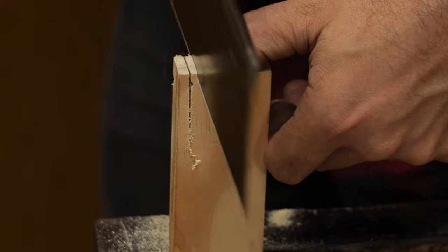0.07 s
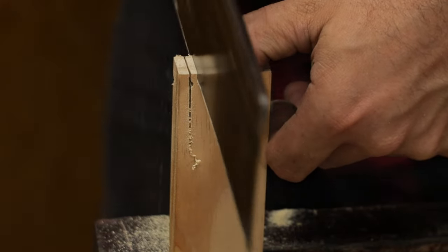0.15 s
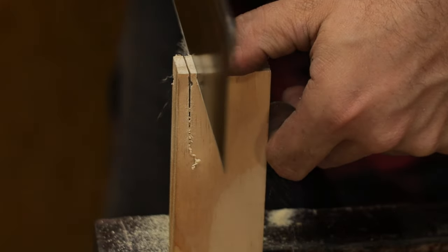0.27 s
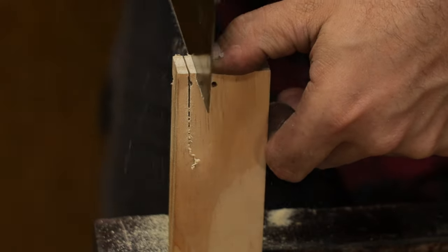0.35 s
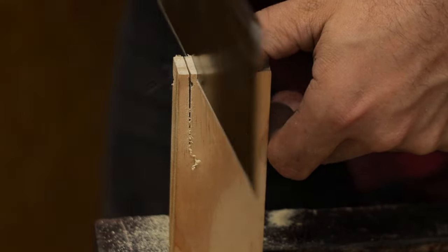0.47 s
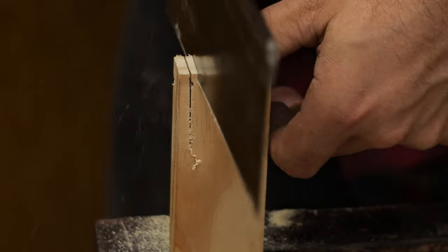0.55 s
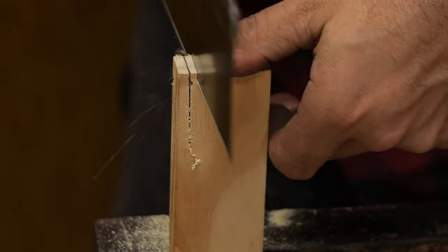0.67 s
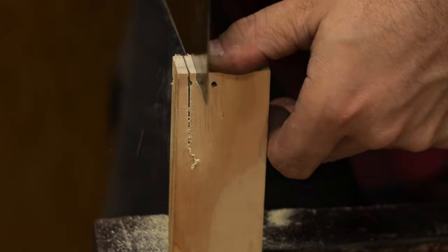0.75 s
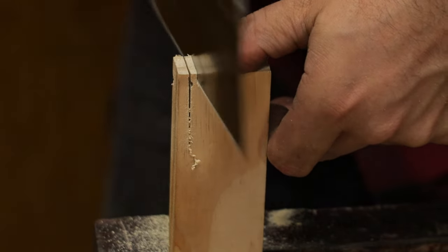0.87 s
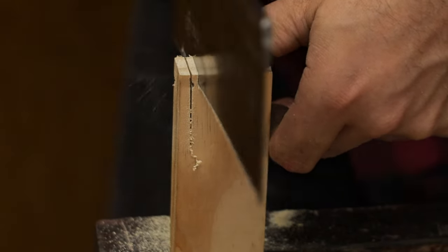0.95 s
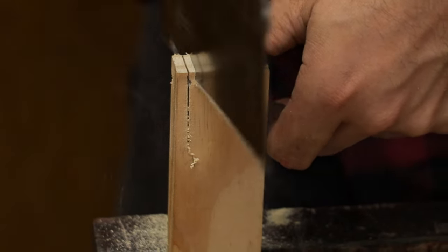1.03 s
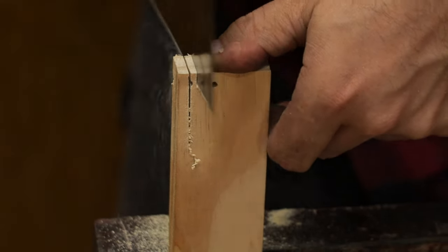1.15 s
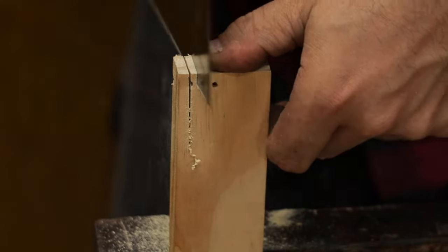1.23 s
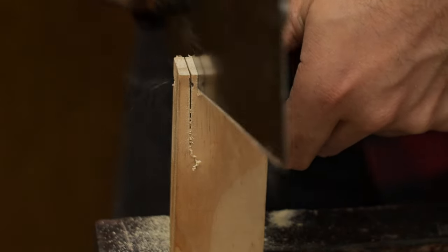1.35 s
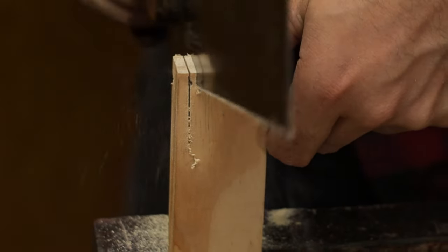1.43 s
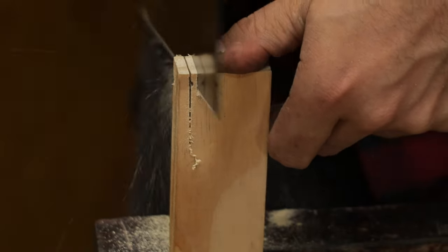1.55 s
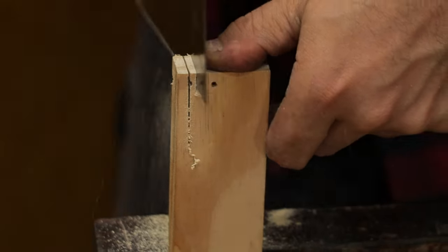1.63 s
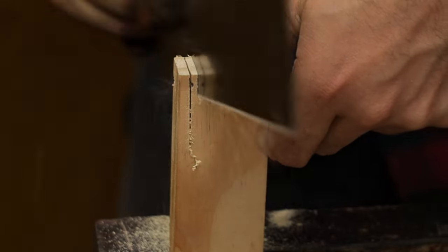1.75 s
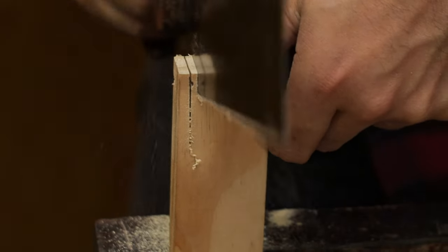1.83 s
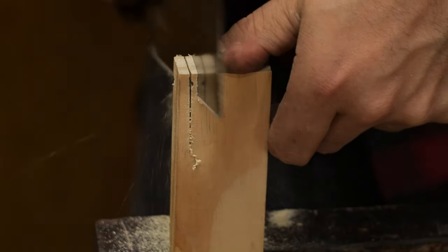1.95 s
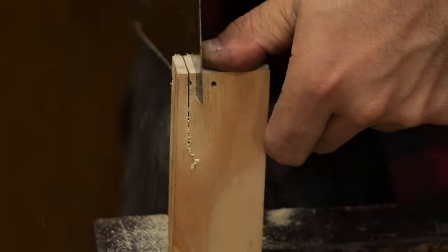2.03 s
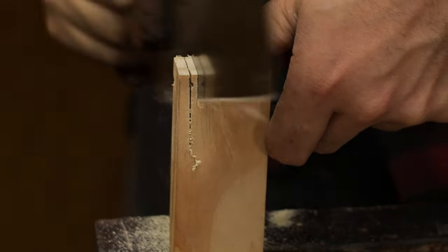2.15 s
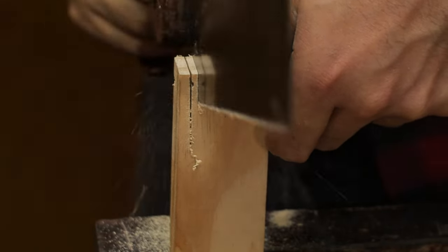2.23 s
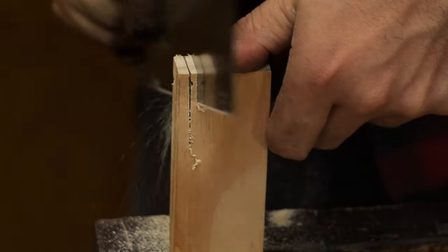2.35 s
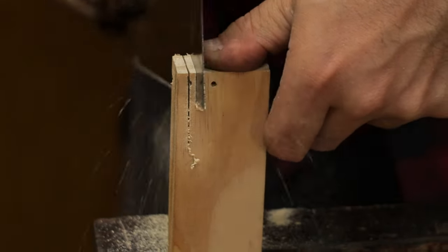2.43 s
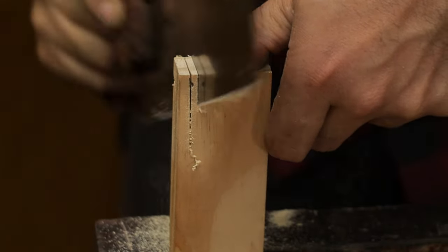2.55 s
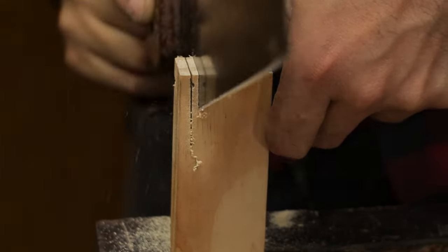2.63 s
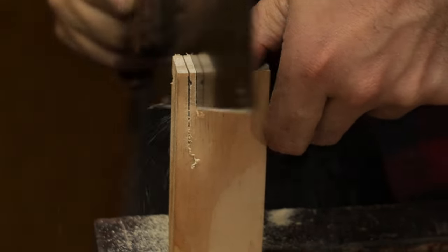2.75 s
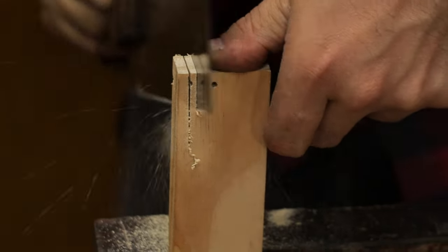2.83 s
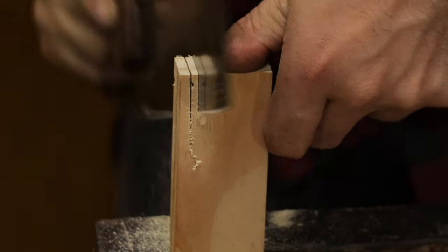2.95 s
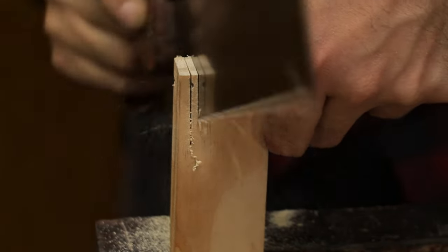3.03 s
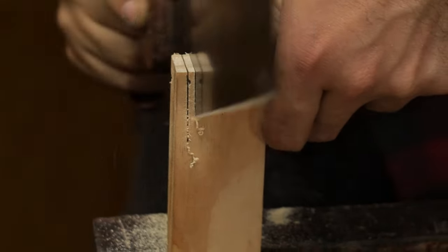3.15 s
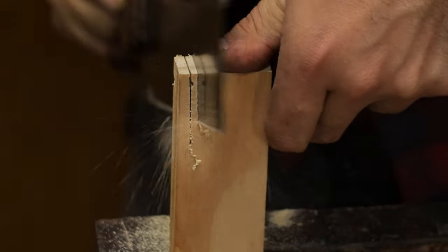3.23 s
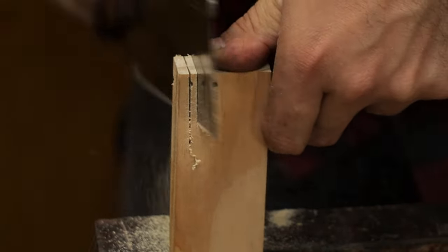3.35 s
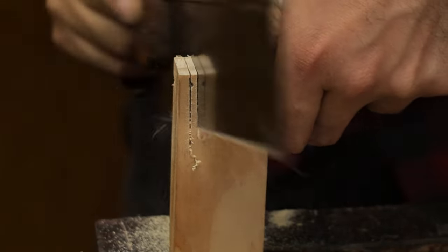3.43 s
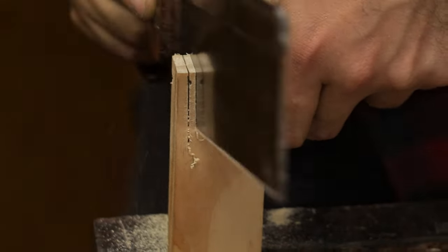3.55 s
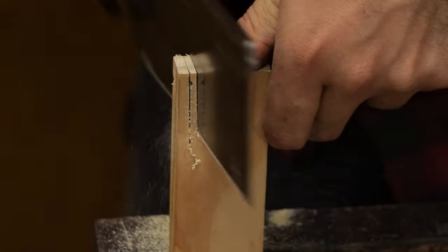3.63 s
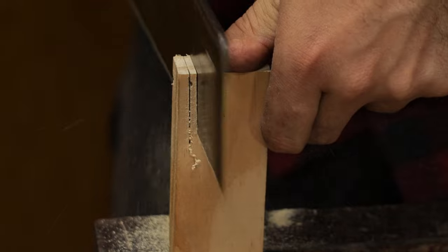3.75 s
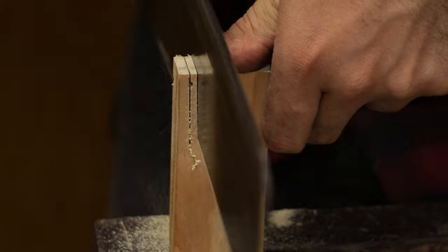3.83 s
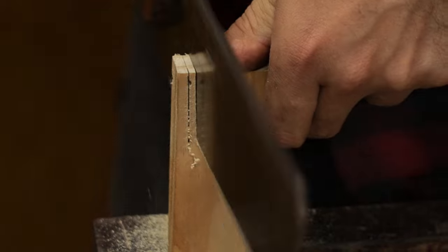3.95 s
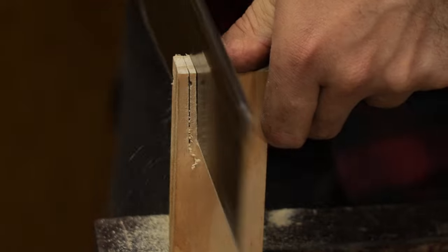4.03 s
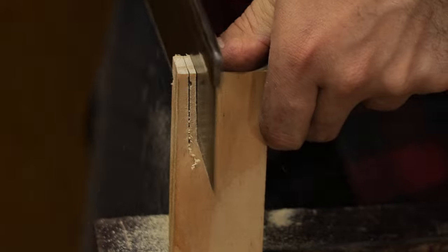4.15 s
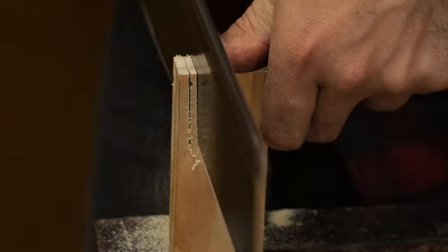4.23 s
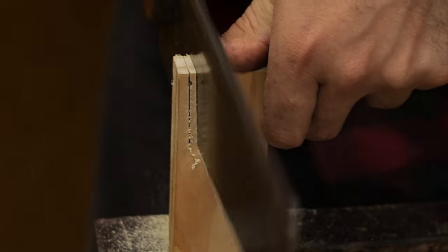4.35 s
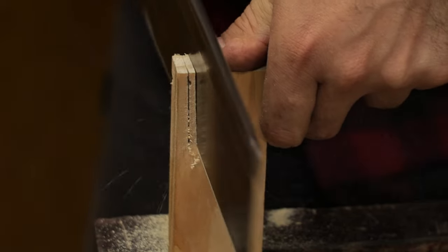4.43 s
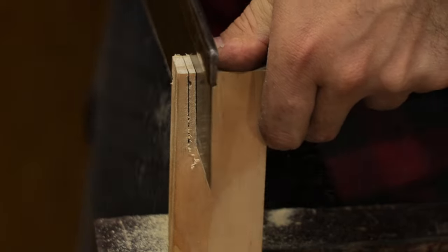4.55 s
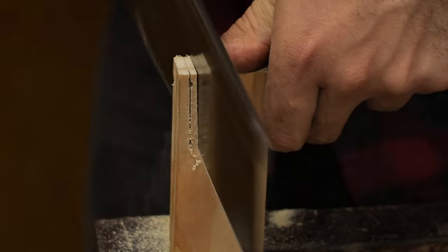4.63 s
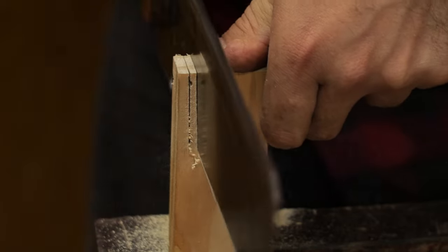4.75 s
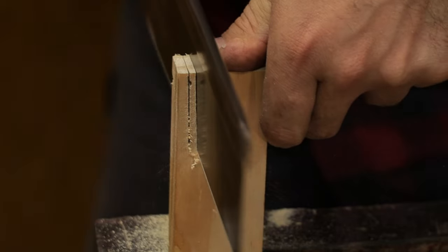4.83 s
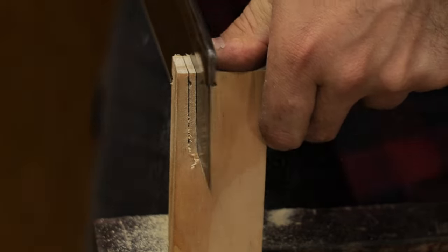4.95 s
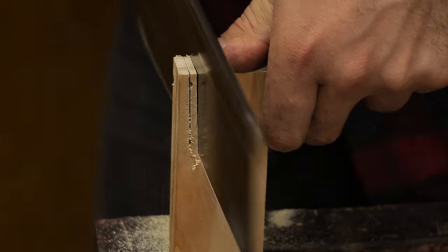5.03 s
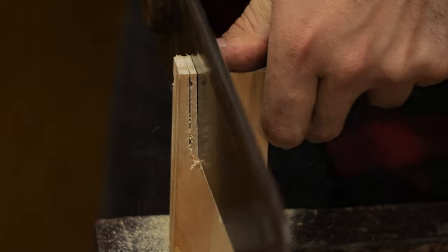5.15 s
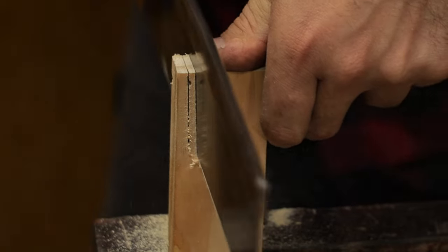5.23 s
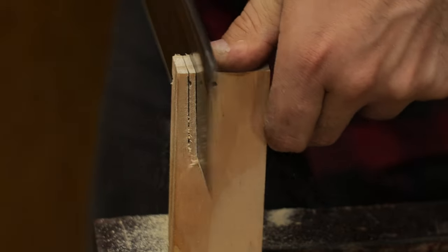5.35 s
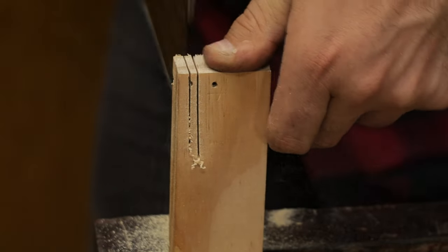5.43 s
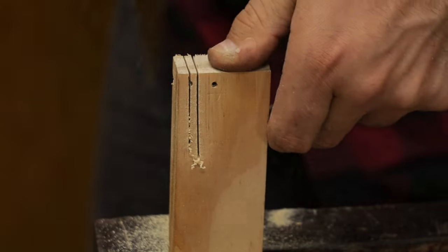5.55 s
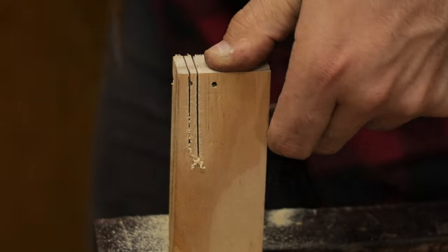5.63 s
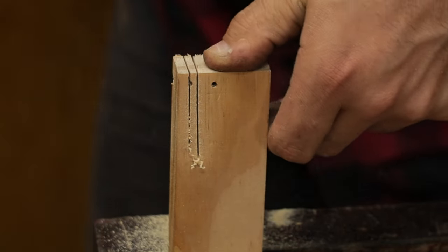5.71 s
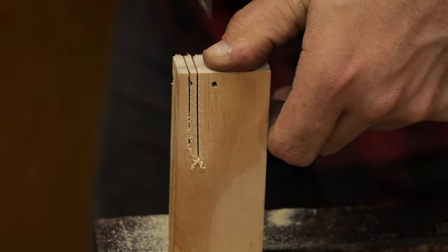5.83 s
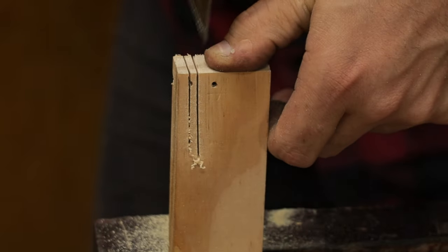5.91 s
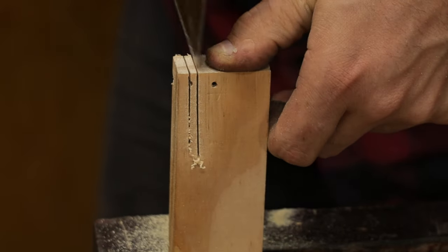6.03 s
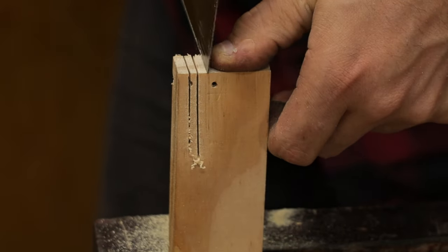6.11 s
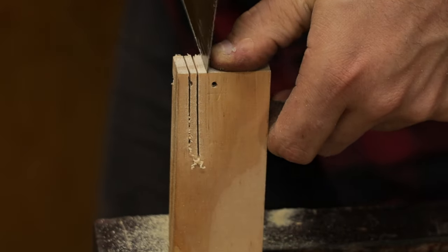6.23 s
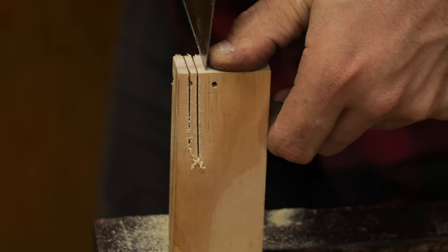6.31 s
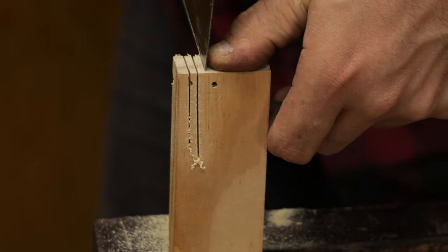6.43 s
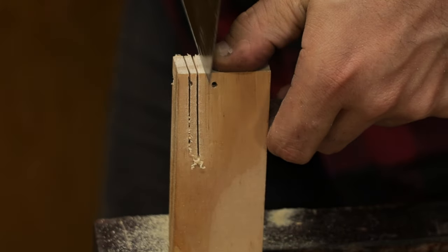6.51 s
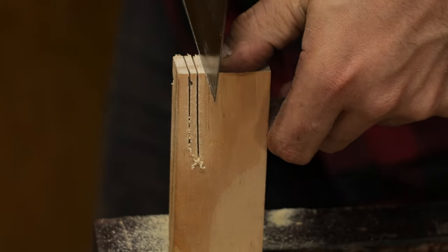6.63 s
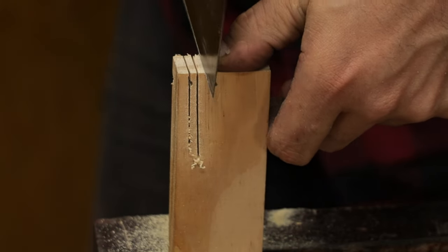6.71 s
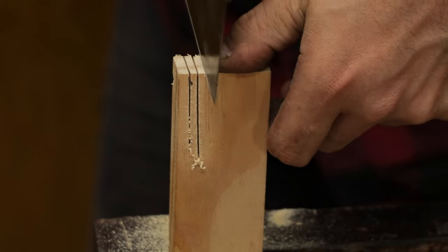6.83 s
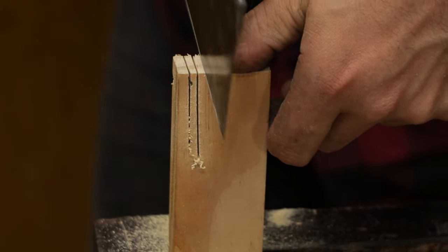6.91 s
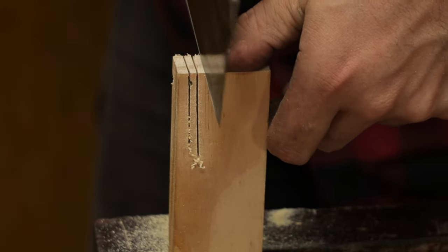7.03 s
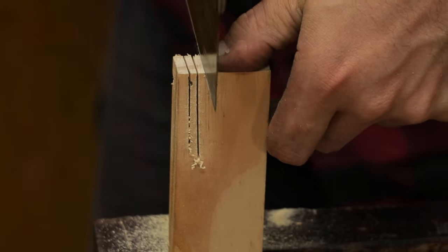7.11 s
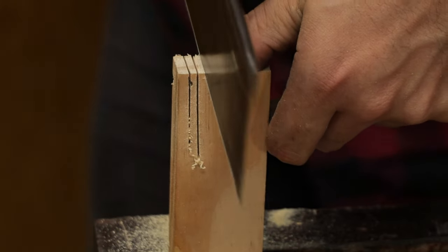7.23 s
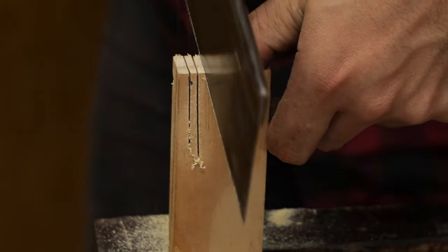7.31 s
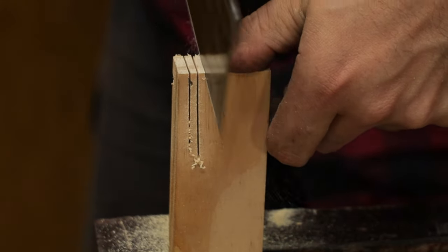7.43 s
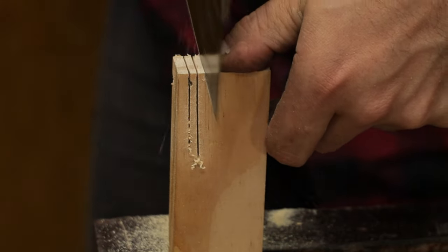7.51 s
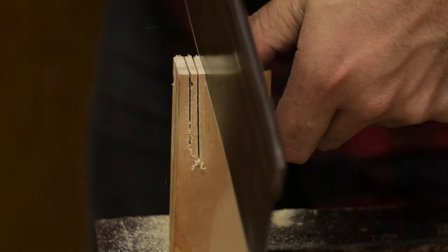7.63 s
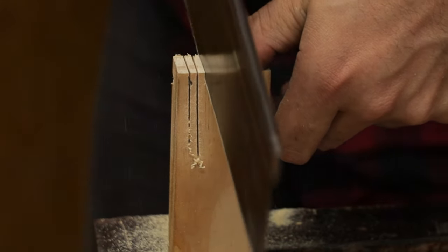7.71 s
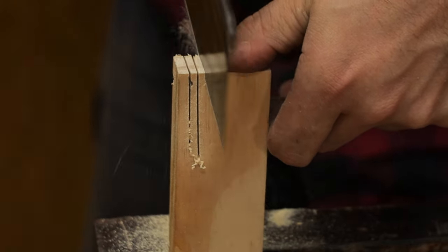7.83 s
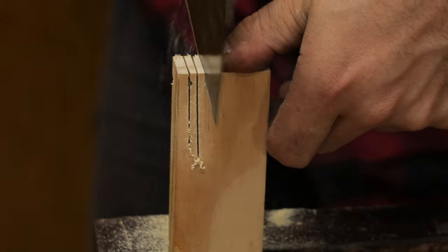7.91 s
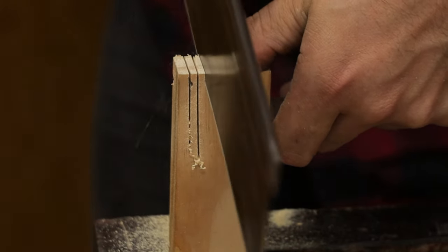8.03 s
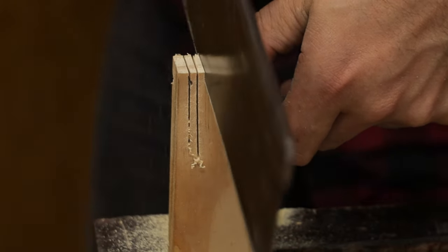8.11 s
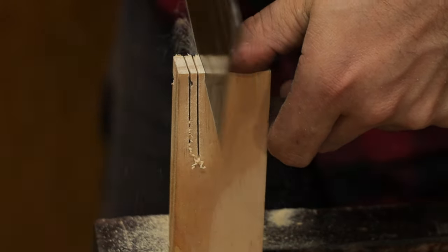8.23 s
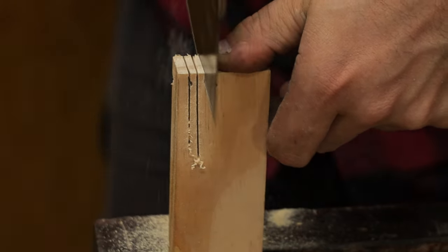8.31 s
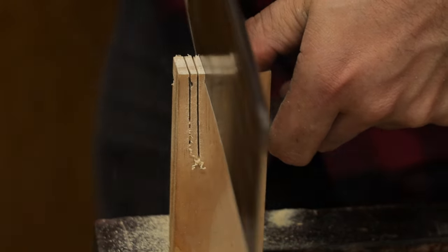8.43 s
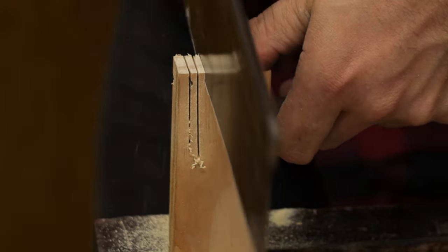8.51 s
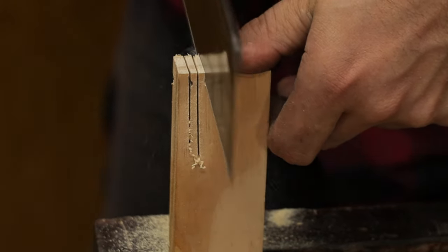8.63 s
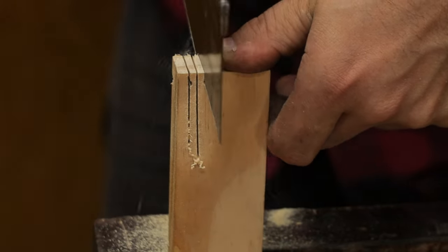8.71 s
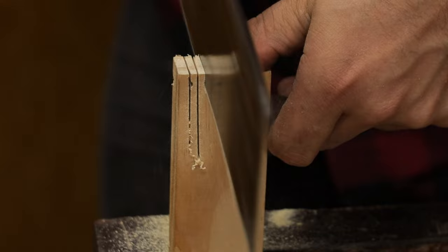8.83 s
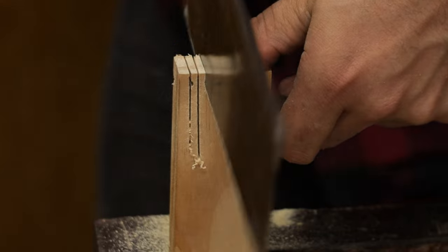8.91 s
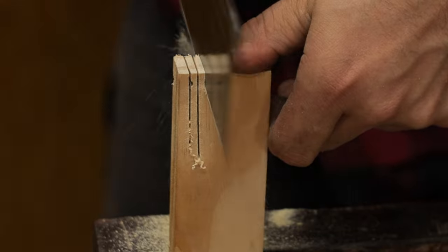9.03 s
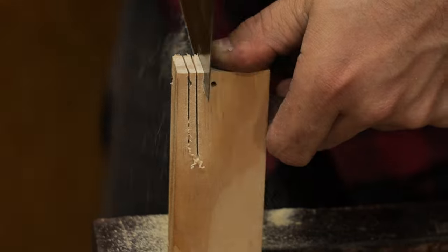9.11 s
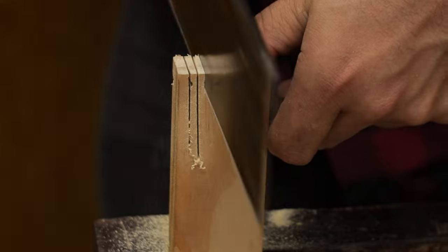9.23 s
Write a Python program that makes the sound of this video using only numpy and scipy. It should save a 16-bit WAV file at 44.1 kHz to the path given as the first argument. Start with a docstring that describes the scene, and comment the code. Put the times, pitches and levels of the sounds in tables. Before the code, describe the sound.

Close, raspy hand sawing in a small board, brisk and juddering, with a brief near-quiet pause and a tap before rough sawing resumes.

```python
"""The end of a light return stroke, then loud rips: a thin hand saw cuts down the end of a small clamped board.
Loud cutting strokes alternate with lighter returns, close by in a workshop with quiet air and a short answer.
Each tooth is a blow that drives modes of bench and board; torn fibres are noise bursts that ring the blade.
Caught teeth make the board judder for a few cycles. The blade hisses as it is drawn out of the kerf,
is set down beside it with a tap, and starts a second kerf."""
import sys
import numpy as np
from scipy import signal
from scipy.fft import rfft, irfft, next_fast_len
from scipy.io import wavfile
from scipy.ndimage import uniform_filter1d, map_coordinates

SR = 44100
rng = np.random.default_rng(int(sys.argv[2]) if len(sys.argv) > 2 else 0)


def put_to_file(sound):
    """Save the sound as 16-bit audio at rate SR, in the file named by the first command-line argument."""
    columns = np.atleast_2d(sound).T  # one column per channel
    safe = np.clip(columns, -1, 1)
    whole_steps = np.round(safe * 32767)
    wavfile.write(sys.argv[1], SR, whole_steps.astype(np.int16))


N = 408366


def amp(db):
    """Decibels to gain."""
    return 10 ** (np.asarray(db) / 20)


def unit(x):
    """x at rms 1."""
    return x / np.sqrt(np.mean(x ** 2) + 1e-20)


def noise():
    """White noise for the whole scene."""
    return rng.standard_normal(N)


def along(points, hz):
    """Interpolate (Hz, value) points on a log frequency axis."""
    point_hz, values = np.transpose(points)
    return np.interp(np.log(hz + 1), np.log(point_hz + 1), values)


def curve(rows):
    """(s, value) rows as one value per sample."""
    return np.interp(np.arange(N) / SR, *np.transpose(rows))


def wobble(knots_per_s):
    """A smooth random curve."""
    return map_coordinates(rng.standard_normal(4096), [np.arange(N) * knots_per_s / SR], mode="wrap")


def filtered(x, response):
    """x times a response of frequency, padded against wrap-round."""
    size = next_fast_len(N + SR // 2)
    return irfft(rfft(x, size) * response(np.fft.rfftfreq(size, 1 / SR)), size)[:N]


def coloured(x, spectrum):
    """x filtered by a (Hz, dB) curve, at rms 1."""
    return unit(filtered(x, lambda hz: amp(along(spectrum, hz))))


def resonate(x, modes):
    """x ringing in (Hz, width Hz, dB) modes of alternating sign, at rms 1."""
    def response(hz):
        total = 0
        for k, (mode_hz, width_hz, db) in enumerate(modes):
            damping = 1j * hz * width_hz
            total = total + (-1) ** k * amp(db) * damping / (mode_hz ** 2 - hz ** 2 + damping)
        return total
    return unit(filtered(x, response))


def shifting(x, patchy_db):
    """Patches of the spectrum of x swell and fade, as when a blade slides through its kerf."""
    z = signal.stft(x, nperseg=512)[2]
    field = uniform_filter1d(rng.standard_normal(z.shape), size=4, axis=0)
    field = uniform_filter1d(field, size=14, axis=1)
    return unit(signal.istft(z * amp(patchy_db * unit(field)), nperseg=512)[1][:N])


def half_sine(progress, skew=1):
    """0 at both ends of a move, 1 near its middle; a skew over 1 peaks late."""
    return np.abs(np.sin(np.pi * progress ** skew))


def swing(start_s, length_s):
    """Speed of one move of the arm, 0 to 1 and back as a half sine."""
    return half_sine(np.clip((np.arange(N) / SR - start_s) / length_s, 0, 1))


# Spectrum of the air. Each row: frequency in Hz, relative level in dB.
SHOP_AIR = [(15, -48.5), (25, -12), (99, -6.5), (161, -10.5), (269, -2.5), (486, -11.5), (1040, -16),
            (1120, -33), (1280, -15.5), (2030, -28), (2260, -18.5), (2730, -31.5), (4450, -25),
            (10500, -32.5), (15800, -42.5)]


def shop_air():
    """Steady coloured noise, with a faint low drone and thin whine as narrow noise bands."""
    air = amp(-70.5) * coloured(noise(), SHOP_AIR)
    drone = amp(-72.0) * resonate(noise(), [(280, 59, 1), (2340, 80, -18.5)])
    return air + drone


# Decay of the workshop. Each row: frequency in Hz, t60 in seconds.
SHOP_DECAY = [(100, 0.62), (400, 0.19), (2000, 0.18), (10000, 0.09)]


def shop_answer(x):
    """The walls answer 5 ms late with a noise tail that dies sooner in the treble."""
    hz, t, z = signal.stft(rng.standard_normal(SR // 2), SR, nperseg=256)
    decay = amp(-60 * t / along(SHOP_DECAY, hz)[:, None])
    tail = signal.istft(z * decay, SR, nperseg=256)[1]
    return signal.fftconvolve(np.pad(x, (SR // 200, 0)), tail / np.linalg.norm(tail))[:N]


# Hand and idle blade on the board. Each row: start in seconds, length in seconds, level at mid-move in dB.
BRUSHES = [(5.6, 0.087, -68), (5.54, 0.61, -75.5), (6.32, 0.34, -77.5)]


def brushing():
    """Faint rubbing noise while the saw is moved to its new line; it swells with each move."""
    rub = sum(amp(db) * swing(start_s, length_s) for start_s, length_s, db in BRUSHES)
    spectrum = [(150, -20.0), (500, 11), (1200, -3.0), (2300, 3.5), (2900, -7.0),
                (4500, 1), (6500, -3.5), (10000, -6.5), (15000, -20)]
    return rub * coloured(noise(), spectrum)


# Spectrum of loose dust and chips. Each row: frequency in Hz, relative level in dB.
DUST = [(3000, -49), (5200, -3), (6000, -4.5), (7000, -3), (8000, -2), (9100, -2), (10000, -5), (12000, -9),
        (15500, -14.5)]
# Drawing the blade out of the first kerf. One row: start in seconds, length in seconds, level at mid-move in dB.
DRAW_OUT = (5.29, 0.2835, -55)


def drawing_out():
    """Airy hiss of the blade's flank sliding through loose dust."""
    start_s, length_s, db = DRAW_OUT
    hiss = coloured(shifting(noise(), patchy_db=3), DUST)
    return amp(db) * swing(start_s, length_s) ** .5 * hiss


# Low, then higher modes of the clamped board. Each row: frequency in Hz, width in Hz, relative level in dB.
THRUM = [(205, 53, -12), (252, 26.4, -0.5), (282.4, 28, -6.5), (327.5, 51.4, -2.5), (378, 49, 3),
         (414.3, 34.7, 0.5)]
BARK = [(467.8, 24.2, -4), (558.8, 28.6, 1), (598.8, 29.7, 0.5), (701, 41, -10.5), (757.7, 35, -5.5),
        (816, 43.7, -6.5), (886.5, 29.7, -8.5), (925.6, 18, -7.5), (1008, 35.7, -8.5)]
# Rasp of blade and kerf with the saw steep, level, or deep. Each row: frequency in Hz, relative level in dB.
STEEP = [(800, -30), (1170, -6.5), (1380, 0), (1850, -3), (2150, -9), (2650, -19), (3100, -11),
         (3550, -1.5), (4000, 2.5), (4500, -1.5), (5200, -5), (5650, -18.5), (6400, -19), (8000, -43)]
LEVEL = [(800, -28), (1180, -14), (1370, 3.5), (1620, -2.5), (1850, -6), (2100, -1), (2400, -5),
         (2700, -14), (3300, -7.5), (4100, -5), (5000, -11.5), (5700, -11), (6600, -14.5), (8500, -41.5)]
DEEP = [(800, -26.5), (1150, 0), (1400, 5.5), (1650, 5), (1950, 2.5), (2400, -17.5), (2700, -16.5),
        (3600, -5), (4100, -9), (5200, -6), (5700, -19.5), (6500, -27.5), (8400, -40)]
# The blade leaves the kerf, then is set down.
# Each row: start in seconds, level in dB, t60 in seconds, blade ping in dB over that level.
TAPS = [(5.518, -45.5, 0.081, 3.5), (6.164, -35.5, 0.194, -29.5)]


def taps():
    """The blade knocks lightly on the wood: decaying noise in modes of board and blade."""
    out, t, source = np.zeros(N), np.arange(N) / SR, noise()
    knock = amp(-10) * resonate(source, BARK) + amp(-9.5) * resonate(source, THRUM)
    knock += amp(-25) * coloured(source, DEEP) + amp(-38.0) * coloured(source, DUST)
    ping = resonate(source, [(1052, 100, -2), (1248, 56, -4), (3400, 820, -18)])
    for start_s, db, t60_s, ping_db in TAPS:
        attack = np.clip((t - start_s) / .002, 0, 1)
        decay = amp(db - 60 * np.maximum(t - start_s, 0) / t60_s)
        out += decay * attack * (knock + amp(ping_db) * ping)
    return out


RELEASE_S = .024  # the sound lags behind the arm and dies away at each turn


def lagged(x):
    """x smoothed by a one-pole lag of the release time."""
    keep = np.exp(-1 / (RELEASE_S * SR))
    return signal.lfilter([1 - keep], [1, -keep], x)


def strokes(rows):
    """Progress 0-1 and strength (a gain) through all strokes in one direction."""
    t, progress, strength = np.arange(N) / SR, np.zeros(N), np.zeros(N)
    for start_s, length_s, db in rows:
        now = slice(*np.searchsorted(t, [start_s, start_s + length_s]))
        progress[now] = (t[now] - start_s) / length_s
        strength[now] = amp(db)
    return progress, strength


# Cutting strokes, then returns. Each row: start in seconds, length in seconds, strength in dB.
CUTS = [(0.076, 0.18, -29.5), (0.466, 0.18, -31), (0.879, 0.21, -31.5), (1.309, 0.19, -31.5),
        (1.716, 0.21, -30.5), (2.126, 0.2, -31.5), (2.549, 0.2, -32), (2.994, 0.18, -32),
        (3.415, 0.19, -32.5), (3.831, 0.17, -32), (4.24, 0.19, -32), (4.649, 0.17, -32), (5.051, 0.18, -34),
        (6.525, 0.19, -47.5), (6.899, 0.16, -41.5), (7.223, 0.17, -32.5), (7.595, 0.17, -28.5),
        (7.998, 0.17, -29.5), (8.388, 0.21, -33.0), (8.828, 0.16, -30), (9.223, 0.18, -28.5)]
RETURNS = [(-0.099, 0.15, -34), (0.277, 0.19, -41.5), (0.673, 0.21, -42.5), (1.113, 0.2, -41.5),
           (1.531, 0.19, -42), (1.937, 0.195, -43), (2.354, 0.19, -43.5), (2.783, 0.2, -42.5),
           (3.219, 0.19, -44.5), (3.638, 0.19, -42), (4.04, 0.19, -41.5), (4.449, 0.19, -40.5),
           (4.862, 0.172, -41), (5.259, 0.27, -50.5), (6.792, 0.056, -58), (7.096, 0.1, -46),
           (7.443, 0.15, -41), (7.813, 0.17, -41.5), (8.217, 0.16, -38.5), (8.584, 0.28, -52),
           (9.024, 0.2, -40)]
# Tooth rate at full blade speed. Each row: time in seconds, teeth per second.
PACE = [(.2, 547), (1, 686), (1.85, 820), (3.5, 792), (3.95, 700), (5.2, 680), (6.6, 442), (8.1, 511),
        (9.2, 624)]
# The hold. Each row: time in seconds, position (0 steep at the corner, 1 level, 2 deep in the kerf).
HOLD = [(.6, 0), (1.45, 0.27), (1.9, 0.64), (2.7, 0.74), (3.4, 1.105), (4.4, 2.036), (5.2, 1.3), (5.8, 0),
        (9.2, 0.15)]
# Voices of a cut, then of a return: bench thud, board thrum, board bark, low rasp, high rasp, dust hiss.
# Each row: level in dB over stroke strength, dB per octave of tooth rate, power of stroke speed,
# skew (over 1 peaks late).
CUT_VOICES = [(-20.5, 5, 1.5, 1.25), (-3, -14.5, 1.22, 1.21), (3.5, -6, 1.14, 1.035), (1, 4, 1.16, 1.106),
              (-0.87, 1.5, 1.5, 0.92), (-14.5, 1.5, 1.1, 1.02)]
RETURN_VOICES = [(-18, 5, 0.2, 0.72), (0, -6, 0.45, .95), (3, -8, 0.56, .9), (-1, -5.5, 0.5, 0.94),
                 (1.26, 4, 0.63, 0.75), (-11.5, -0.5, 0.66, .9)]
# Gain of each voice in dB when the blade is deep in the kerf, in the same order.
DEEP_GAIN_DB = [5.5, 2.5, 4, -2.5, 0.5, 1.5]
USUAL_HZ, CRAWL_HZ = 613, 438  # tooth rates: reference, and the floor below which voice levels stay put
TURN_SPEED = .25  # share of the full tooth rate left at the ends of a stroke
OUTRUN_FROM = 0.76  # share of full pace above which voice levels follow the rate within a stroke


def saw_motion():
    """Blade speed, tooth rate and six voice gains, each growing with its own power of stroke speed."""
    cut, back, pace = strokes(CUTS), strokes(RETURNS), curve(PACE)
    speed = lagged(half_sine(cut[0]) + half_sine(back[0]))
    rate = pace * (TURN_SPEED + (1 - TURN_SPEED) * speed)
    voiced_rate = np.maximum(np.maximum(rate, OUTRUN_FROM * pace), CRAWL_HZ)
    octaves = np.log2(voiced_rate / USUAL_HZ)
    depth = np.clip(curve(HOLD) - 1, 0, 1)
    gains = np.zeros((len(DEEP_GAIN_DB), N))
    for (progress, strength), voices in ((cut, CUT_VOICES), (back, RETURN_VOICES)):
        for k, (db, db_per_octave, power, skew) in enumerate(voices):
            swell = lagged(strength * half_sine(progress, skew) ** power)
            gains[k] += swell * amp(db + db_per_octave * octaves + DEEP_GAIN_DB[k] * depth)
    return speed, rate, gains


def teeth(rate, scatter, uneven_db):
    """One blow for each tooth that meets the wood, uneven in time and size."""
    passed = np.cumsum(rate) / SR
    chance = rng.standard_normal((int(passed[-1]), 2))
    at = np.searchsorted(passed, np.arange(len(chance)) + scatter * chance[:, 0]).clip(0, N - 1)
    size = amp(uneven_db * chance[:, 1]) / np.sqrt(rate[at])
    return unit(np.bincount(at, size, N))


def tearing(blows, life_s, smooth):
    """Fibres tear in a short burst of noise behind each tooth, over even friction."""
    bursts = unit(signal.lfilter([1], [1, -np.exp(-1 / (life_s * SR))], blows))
    return unit((bursts + smooth) * noise())


# Hard catches of a tooth. Each row: start in seconds, peak in dB, judder in Hz.
CATCHES = [(.108, -21.5, 536), (.156, -14.5, 556), (.228, -18.5, 429), (.567, -17.5, 544),
           (0.592, -17.5, 480.7), (1.456, -19, 529), (1.82, -23, 788.4), (2.656, -22, 783.8),
           (3.087, -20.5, 851.6), (3.116, -22, 775), (3.508, -18.5, 887.4), (3.89, -16, 586.6),
           (4.356, -13.5, 599.6), (4.491, -19, 620.3), (4.76, -14, 562.2), (4.887, -18, 586.5),
           (5.149, -25, 592.7), (6.978, -22.5, 568.3), (7.017, -21.5, 532.3), (7.262, -20.5, 352),
           (7.293, -16.5, 574.7), (7.315, -18.5, 237.5), (7.34, -18.5, 239), (7.351, -15, 512),
           (7.625, -19, 568.4), (7.656, -21, 280.3), (7.687, -12.5, 337.6), (7.722, -19.5, 543.5),
           (8.037, -9.5, 560.5), (8.097, -8, 380), (8.15, -16, 572), (8.239, -22.5, 551.8),
           (8.434, -21.5, 588.6)]
GRAB_S, GRAB_HZ = .03, 563  # grab after each turn: delay, judder pitch
GRAB_DB, RETURN_GRAB_DB = 1, 7  # grab peak over the strength of a cut, of a return
GRAB_DB_PER_OCTAVE = -13  # return grabs fade at a brisk pace
SNAG_DB = 8.5  # snag peak over a cut's strength
CATCH_SPREAD_DB, CATCH_SPREAD = 1.5, 0.064  # random spread of level, and of log pitch, in grabs and snags


def light_catches(rate):
    """Rows like CATCHES: a grab as each stroke starts, and a snag along each cut at the tooth rate."""
    def sample(time_s):
        return int(np.clip(time_s * SR, 0, N - 1))

    def free(time_s):
        clear = all(abs(time_s - hard[0]) > .02 for hard in CATCHES)
        return 0 < time_s < N / SR and clear

    pace_db = GRAB_DB_PER_OCTAVE * np.log2(curve(PACE) / USUAL_HZ)
    rows = [(start_s + GRAB_S, db + GRAB_DB, GRAB_HZ) for start_s, _, db in CUTS]
    for start_s, _, db in RETURNS:
        rows.append((start_s + GRAB_S, db + RETURN_GRAB_DB + pace_db[sample(start_s)], GRAB_HZ))
    for start_s, length_s, db in CUTS:
        snag_s = start_s + length_s * rng.uniform(0.34, .8)
        rows.append((snag_s, db + SNAG_DB, rate[sample(snag_s)]))
    chance = rng.standard_normal((len(rows), 2))
    return [(s, db + CATCH_SPREAD_DB * a, hz * np.exp(CATCH_SPREAD * b))
            for (s, db, hz), (a, b) in zip(rows, chance) if free(s)]


def catches(rows, rise_s=0.0058, fall_s=0.0067, sag=0.037):
    """The board judders against a caught tooth, sinking in pitch; also gives the strain 0-1."""
    judder, strain, t = np.zeros(N + SR), np.zeros(N + SR), np.arange(SR // 16) / SR
    swell = np.sin(np.pi / 2 * np.minimum(t / rise_s, 1)) ** 2 / (1 + np.exp((t - .016) / fall_s))
    for start_s, db, hz in rows:
        phase = 2 * np.pi * np.cumsum(hz * (1 + sag * (.5 - t / 0.023))) / SR
        cycles = np.sin(phase) + 0.025 * np.sin(2 * phase)
        now = slice(round(start_s * SR), round(start_s * SR) + len(t))
        judder[now] += amp(db) * swell * cycles
        strain[now] += swell
    return judder[:N], np.minimum(strain[:N], 1)


def grunt(rate, unsteady, rough_db):
    """The ragged note of the passing teeth, rising and sinking with the blade's speed."""
    phase = 2 * np.pi * np.cumsum(rate * np.exp(unsteady * wobble(420))) / SR
    return unit(amp(rough_db * wobble(230)) * (np.sin(phase) + 0.021 * np.sin(2 * phase)))


def blade_ring(x, t60_s, changes_per_s=9):
    """Dense modes of the steel sheet as noise tails, crossfaded as the wood grips it at other places."""
    t = np.arange(SR // 8) / SR
    out = np.zeros(N)
    hop = SR // changes_per_s
    padded = np.pad(x, (hop, 2 * hop))
    for i in range(0, N + hop, hop):
        ring = rng.standard_normal(len(t)) * amp(-60 * t / t60_s)
        piece = padded[i:i + 2 * hop]
        rung = signal.fftconvolve(piece * np.hanning(len(piece)), ring)[max(hop - i, 0):]
        room = out[max(i - hop, 0):][:len(rung)]
        room += rung[:len(room)]  # a view: adds into out
    return unit(out)


RASP_SPLIT_HZ = 1980  # where the low rasp gives way to the high rasp


def blade_rasp(steel, low_gain, high_gain):
    """Scrape and ring of the steel, its colour blended by the hold, in two bands."""
    hold, blade = curve(HOLD), np.zeros(N)
    for k, spectrum in enumerate((STEEP, LEVEL, DEEP)):
        blade += np.clip(1 - np.abs(hold - k), 0, 1) * coloured(steel, spectrum)
    coarse = filtered(blade, lambda hz: 1 / (1 + (hz / RASP_SPLIT_HZ) ** 8))
    return low_gain * coarse + high_gain * (blade - coarse)


# Spectrum of the bench thud. Each row: frequency in Hz, relative level in dB.
BENCH = [(20, -43.5), (45, -10), (60, -2), (82, 1.5), (110, -1.5), (135, -0.5), (160, -8), (185, -5),
         (260, -42)]
GRUNT_DB, GRUNT_DB_PER_OCTAVE = -6.5, 10  # note of the teeth over the bark; it stands out at a brisk pace


def sawing():
    """The teeth drive bench, board and blade; hard and soft grain makes the bite uneven."""
    speed, rate, (thud, thrum, bark, low_rasp, high_rasp, hiss) = saw_motion()
    blows = teeth(rate, scatter=.14, uneven_db=3.5)
    judder, strain = catches(list(CATCHES) + light_catches(rate))
    grain = 0.75 * wobble(105) + 1.1 * strain

    push = blows + 0.42 * tearing(blows, life_s=0.00075, smooth=0.8)
    push = unit(amp(2.8 * grain) * push)
    low = thud * coloured(push, BENCH) + thrum * resonate(push, THRUM)
    grunt_db = GRUNT_DB + GRUNT_DB_PER_OCTAVE * np.log2(curve(PACE) / USUAL_HZ)
    note = amp(grunt_db) * speed ** 1.26 * grunt(rate, unsteady=.15, rough_db=4.5)
    high = bark * (resonate(push, BARK) + note)

    scrape = unit(amp(1.4 * grain) * tearing(blows, life_s=0.0014, smooth=1.0))
    steel = shifting(scrape + 0.52 * blade_ring(scrape, t60_s=0.028), patchy_db=1.88)
    rasp = blade_rasp(steel, low_rasp, high_rasp)

    chips = amp(1.7 * grain + 1.3 * wobble(40)) * tearing(blows, life_s=0.0016, smooth=3.5)
    dust = coloured(shifting(chips + 0.32 * steel, patchy_db=2.5), DUST)
    return low + high + judder + rasp + hiss * dust


def scene():
    """The saw and the workshop's answer to it, over the quiet air."""
    saw = sawing() + drawing_out() + taps() + brushing()
    return (saw + amp(-11.0) * shop_answer(saw) + shop_air())[None]


TOP_HZ = 15780


def record(dry):
    """Nothing is kept above the band limit."""
    return filtered(dry[0], lambda hz: hz < TOP_HZ)[None]


dry = scene()
out = record(dry)
put_to_file(out)
```